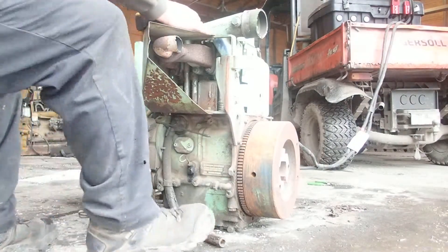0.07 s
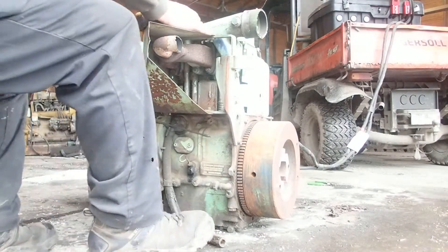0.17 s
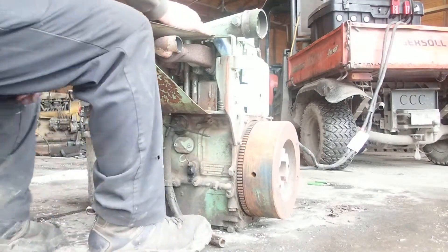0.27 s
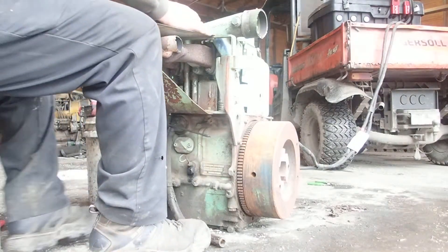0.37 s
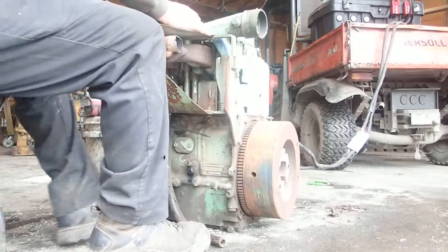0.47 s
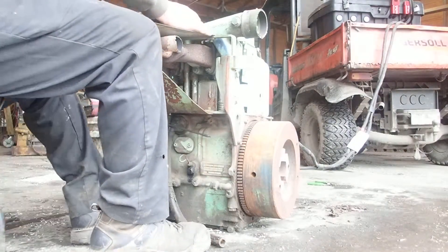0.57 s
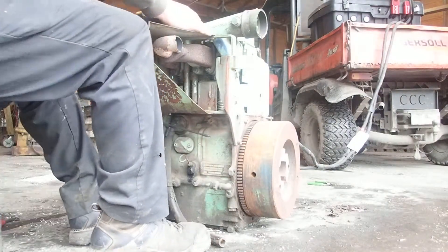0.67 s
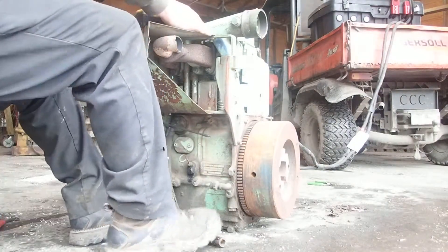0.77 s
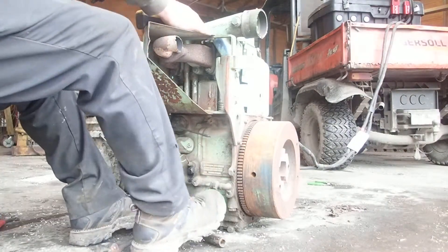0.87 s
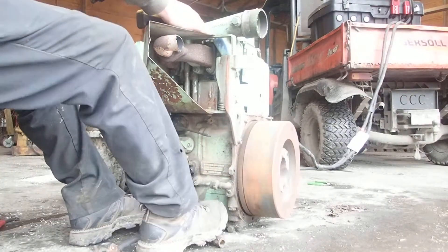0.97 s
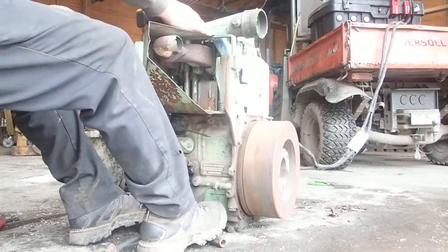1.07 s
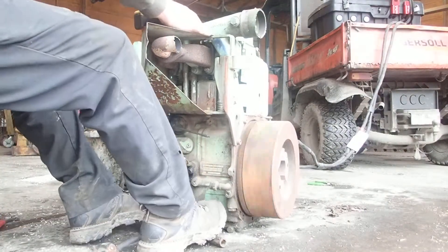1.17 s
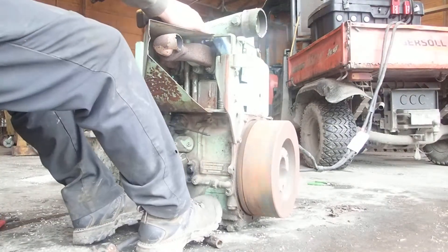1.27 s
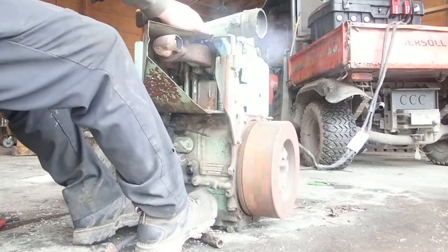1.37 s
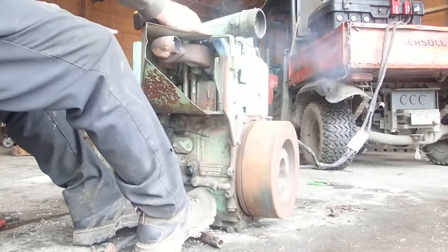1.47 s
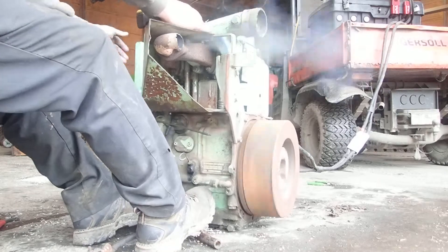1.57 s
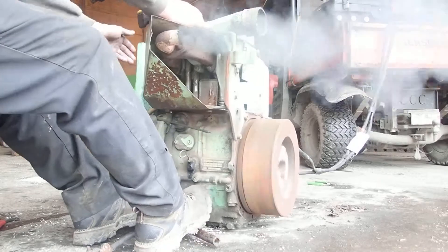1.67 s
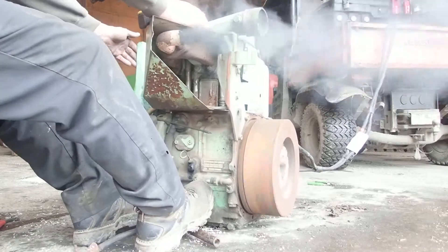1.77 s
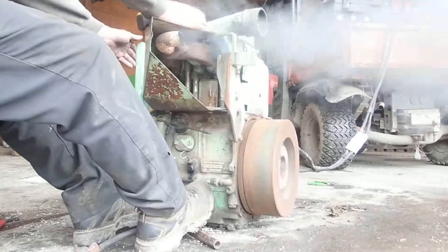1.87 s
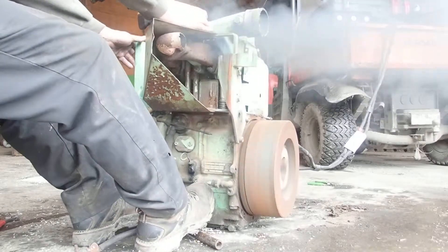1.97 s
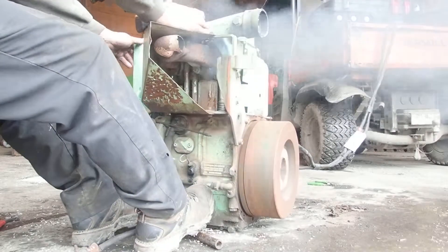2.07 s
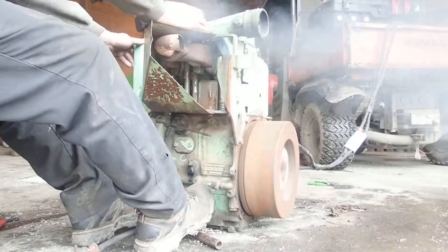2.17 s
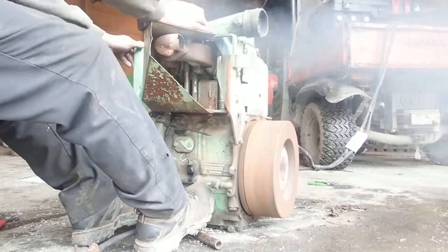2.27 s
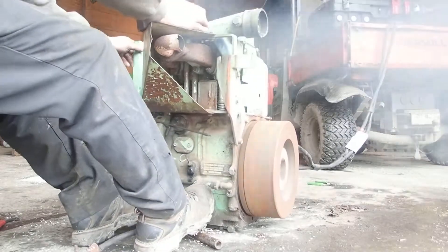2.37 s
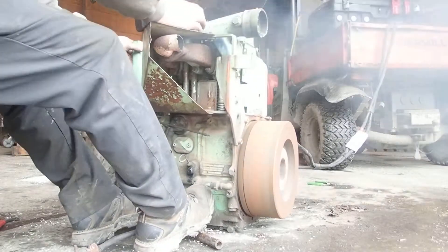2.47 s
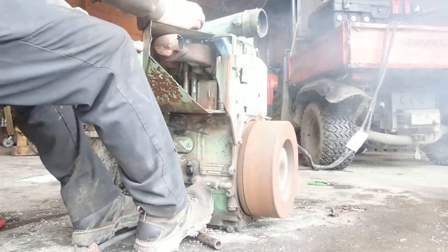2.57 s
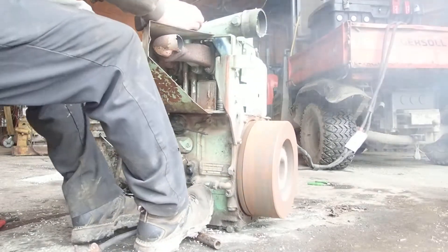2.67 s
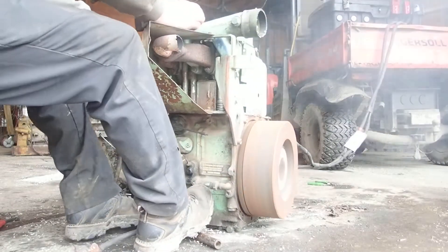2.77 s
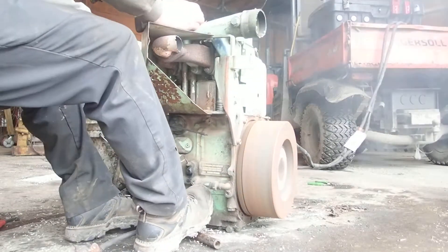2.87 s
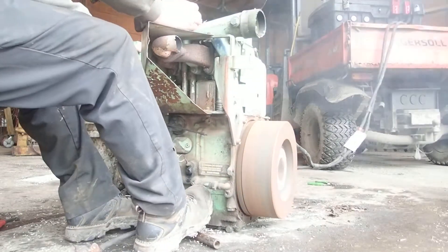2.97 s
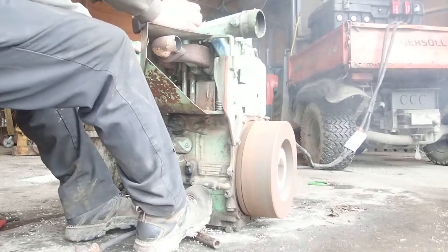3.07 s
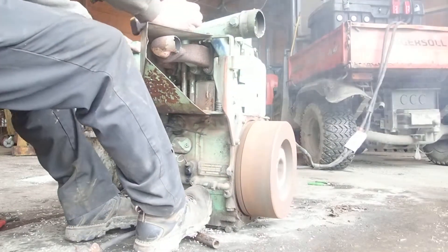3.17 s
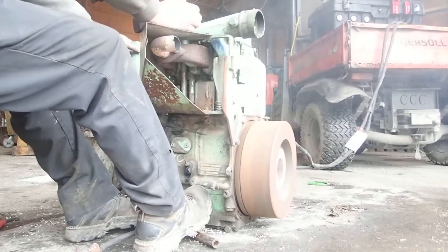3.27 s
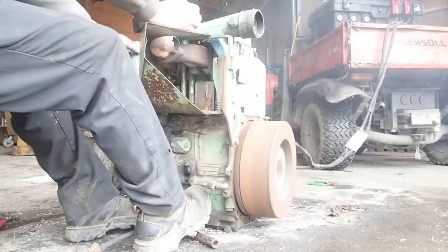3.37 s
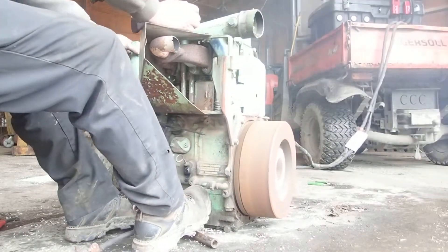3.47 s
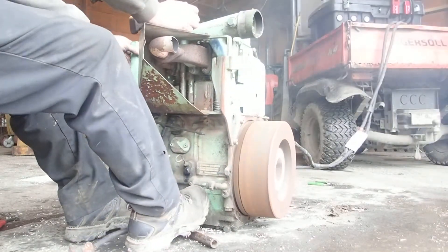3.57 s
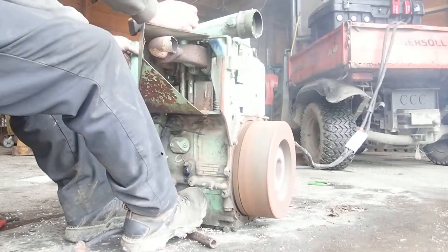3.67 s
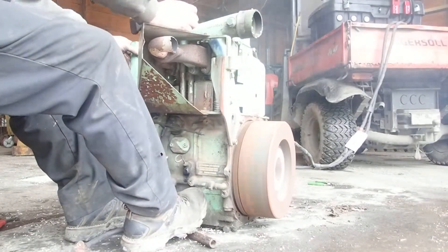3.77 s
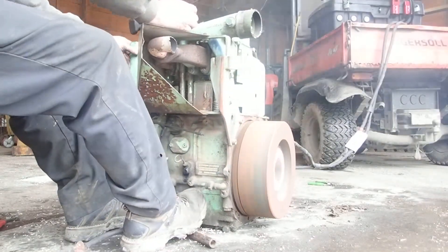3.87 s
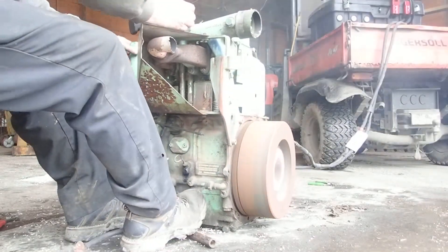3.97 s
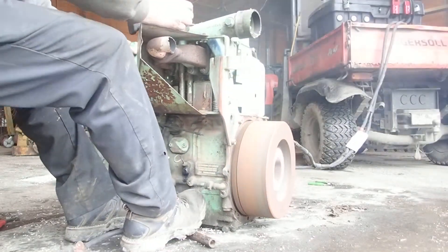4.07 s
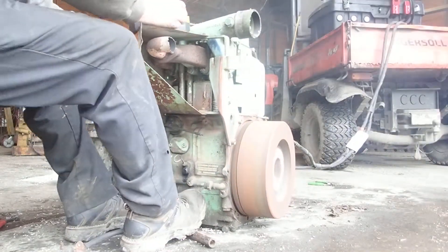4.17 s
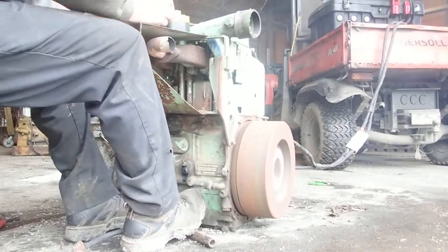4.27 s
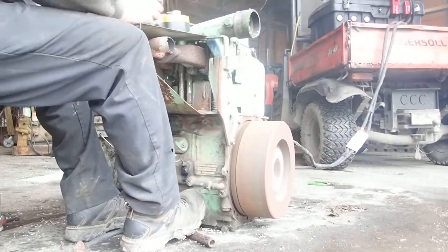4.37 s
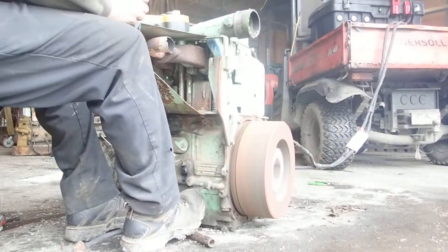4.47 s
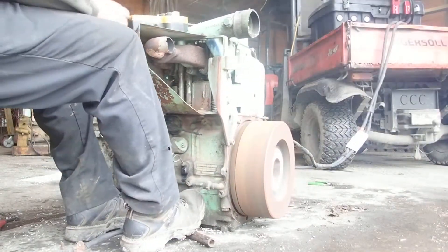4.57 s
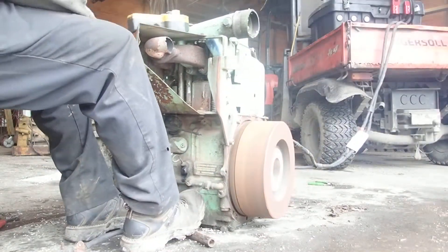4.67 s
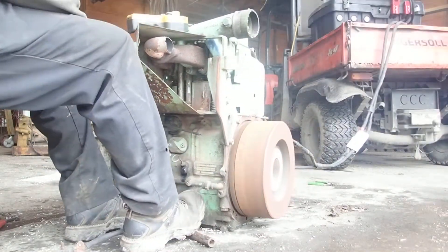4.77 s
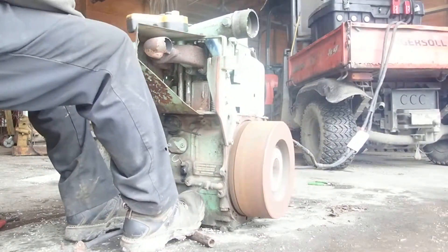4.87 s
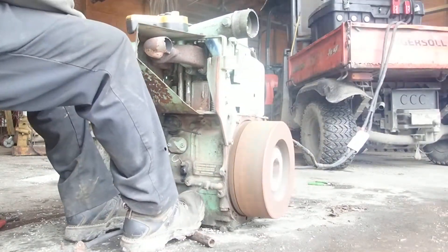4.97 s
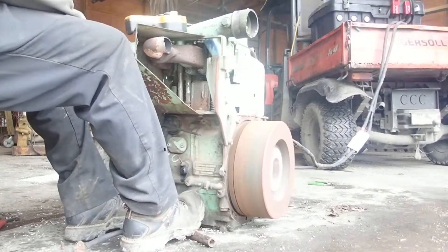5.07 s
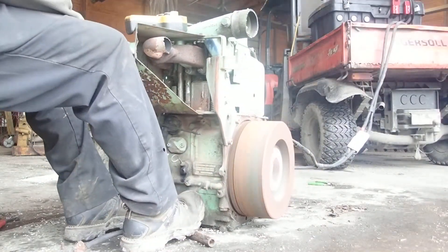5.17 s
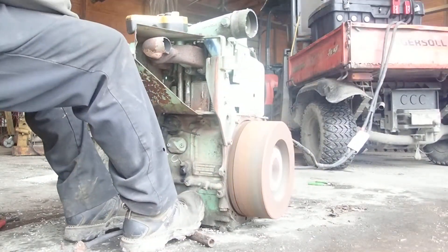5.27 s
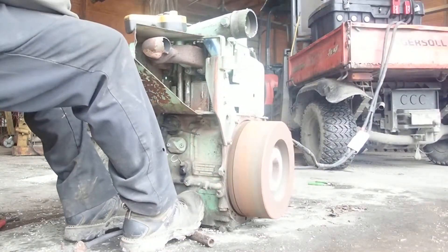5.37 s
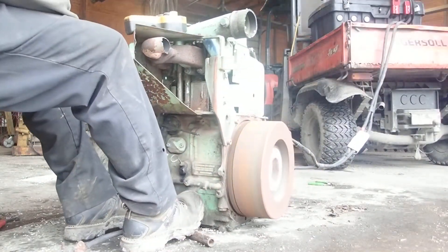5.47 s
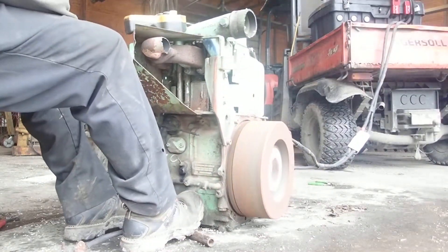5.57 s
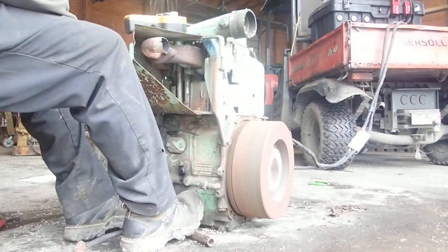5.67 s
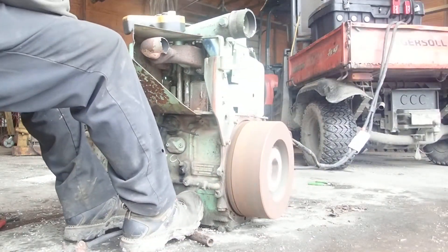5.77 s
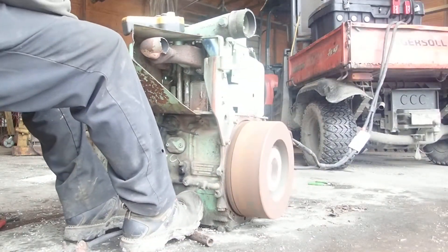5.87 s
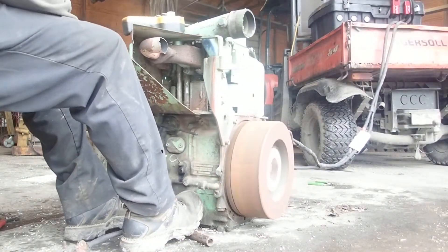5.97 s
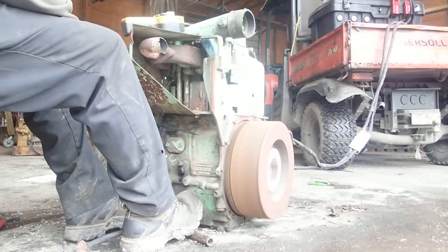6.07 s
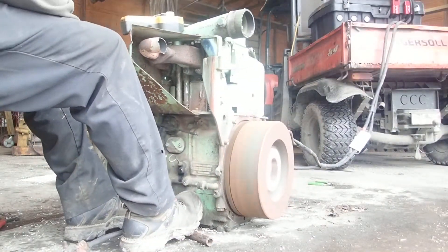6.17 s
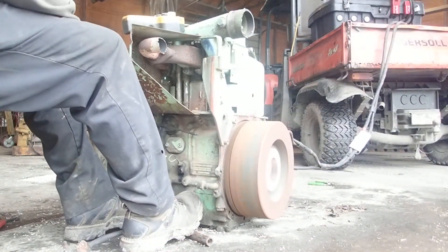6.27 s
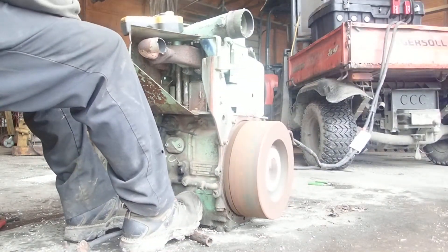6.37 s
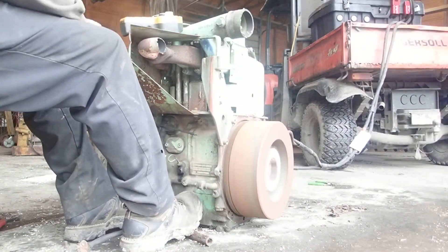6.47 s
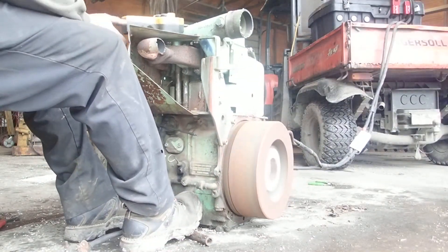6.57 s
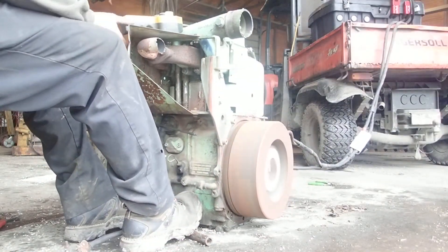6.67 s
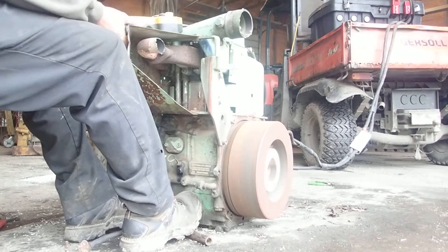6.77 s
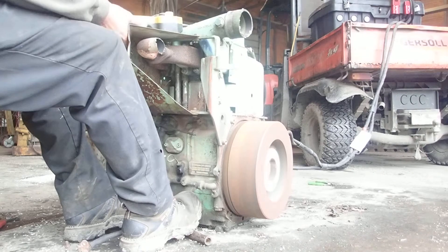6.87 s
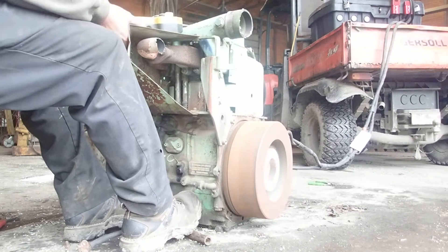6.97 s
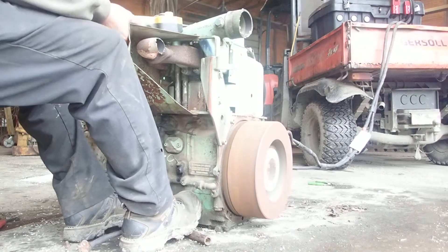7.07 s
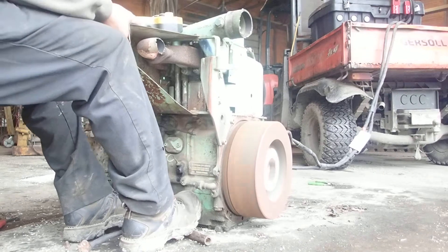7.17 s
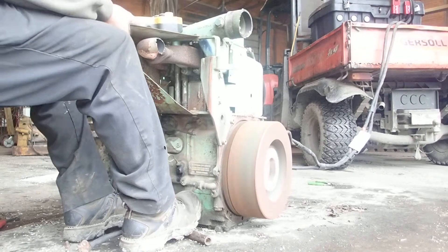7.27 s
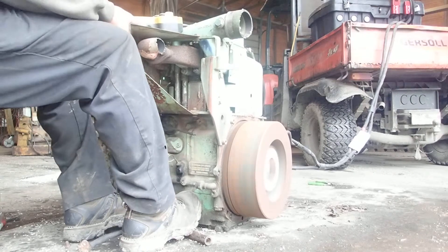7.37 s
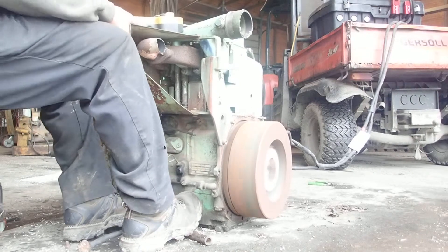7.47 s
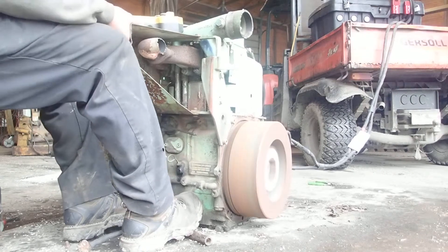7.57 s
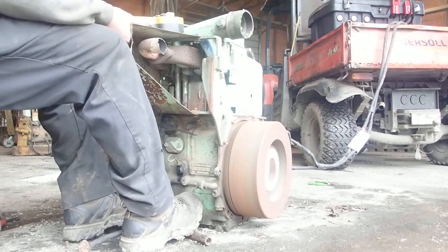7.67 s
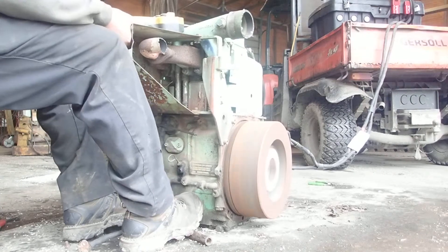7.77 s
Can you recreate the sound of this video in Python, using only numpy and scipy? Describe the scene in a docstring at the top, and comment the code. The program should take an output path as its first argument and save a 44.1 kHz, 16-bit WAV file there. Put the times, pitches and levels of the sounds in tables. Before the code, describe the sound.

From 0 s another diesel idles softly across a workshop, about twenty even ticks a second with a faint rattle and wavering hum. At 0.2-0.4 s there is a light metal click and a boot scuff on concrete, then a small dull thump near 0.55 s. A rapid, hard cluster of metal clashes lands at 0.93-0.98 s. The starter growls and scrapes until about 1.6 s, its gear rim ringing, with brief skids and low floor thumps. At 1.6 s the close engine catches: sharp, bright exhaust spits in uneven pairs, with gliding low booms and compression groans, rapidly accelerating until about 2.8 s. Around 2.9-3.2 s the harsh spits and boom fall away. From there to nearly 8 s it holds an almost constant speed: low buzzing drone, dense block knocks, crisp valve ticks and clinks, with short room reflections.

```python
"""On a workshop floor, a bare twin-cylinder air-cooled diesel is started while another engine idles further off.
The starter clashes in and grinds, made of noise bursts and gear-like noise. Then the cylinders fire in pairs,
a quarter cycle apart, and gather speed to a steady run: each puff is a burst of noise through resonances.
The block clatters with filtered knocks, the port booms with a gliding tone, and a stack of tones makes the drone.
A close microphone rounds the peaks."""
import sys
import numpy as np
from scipy import signal
from scipy.fft import rfft, irfft
from scipy.io import wavfile

SR = 44100
rng = np.random.default_rng(int(sys.argv[2]) if len(sys.argv) > 2 else 0)


def transcribe(u):
    """Save the signal u as a 16-bit wav file named by the first command-line argument.

    u: samples, shape (n,) or (channels, n), limited to [-1, 1]; the rate is SR.
    q: integer samples, one column per channel.
    """
    v = np.clip(np.atleast_2d(u).T, -1, 1)
    q = np.round(v * 32767).astype(np.int16)
    wavfile.write(sys.argv[1], SR, q)


N = 344862
TIME = np.arange(N) / SR  # seconds

# how the engine catches and runs up to its steady speed: time_s, speed (four-stroke cycles per s)
ENGINE_SPEED = [(1.6, 3.87), (1.79, 5.18), (2.17, 8.91), (2.67, 13.65), (2.82, 14.78), (3.17, 15.38),
                (4.2, 15.33), (6.3, 15.47), (7.8, 15.4)]
FIRST_PUFF_S = 1.5964


def engine_speed(s):
    """Speed in four-stroke cycles per second at a time, read from the run-up curve."""
    return np.interp(s, *np.transpose(ENGINE_SPEED))


def crank():
    """Adding up the speed gives the cycles turned since the first exhaust puff."""
    cycles = np.cumsum(engine_speed(TIME)) / SR
    return cycles - np.interp(FIRST_PUFF_S, TIME, cycles)


# the extra fuel for starting is taken back as the speed arrives: time_s, fuel_share (0-1)
STARTING_FUEL = [(2.3, 0.59), (2.65, 0.55), (2.88, 0.49), (3.03, 0.23), (3.17, 0.07)]


def fuel(s):
    """Share of the starting fuel that is still delivered at a time."""
    return np.clip(np.interp(s, *np.transpose(STARTING_FUEL)), 0, 1)


def running(rise_s=.03):
    """0 before the engine catches, rising to 1 just after."""
    return np.clip((TIME - FIRST_PUFF_S) / rise_s, 0, 1)


# exhaust puffs in each cycle: phase (0-1 of a cycle), level_db at fuel share 1, level_db at fuel share 0
EXHAUST_PUFFS = [(0, -0.5, -17), (.25, 1, -24.5)]
# tone of the escaping gas: pitch_hz, level_db
PUFF_TONE = [(1410, -34), (2400, -25), (2480, -38), (2680, -7.5), (3110, -11), (4050, -5.5), (4700, -3),
             (5200, 6), (6170, 2), (7500, 6.5), (8840, -1), (9860, -5.5), (10600, -10), (13400, -7.5),
             (15500, -26)]
# whistling tones of the exhaust port: pitch_hz, width_hz, level_db
PORT_WHISTLES = [(5260, 94, 18.5), (5810, 140, 14), (6620, 150, 15.5), (7000, 150, 16.5), (8830, 200, 15.5)]
PUFF_SCATTER_DB = 1.93
# a valve opens over a fixed crank angle, so the puff shortens with speed
PUFF_HOLD_S, PUFF_HOLD_CYCLES, PUFF_DECAY_S = .0017, .021, .0025


def exhaust_puffs(cycles, lag_s=.0009, whistle_db=-5, body_db=-8.0, thud_db=-17):
    """Each opening exhaust valve lets out a sharp spit of gas, harder with more starting fuel."""
    gas = 0
    for phase, fuelled_db, lean_db in EXHAUST_PUFFS:
        times = passes(cycles, phase)
        share = fuel(times)
        strength_db = lean_db + (fuelled_db - lean_db) * share
        strength_db = strength_db + PUFF_SCATTER_DB * rng.standard_normal(len(times))
        hold_s = PUFF_HOLD_S + PUFF_HOLD_CYCLES / engine_speed(times)
        gas = gas + bursts(times + lag_s * share, strength_db, PUFF_DECAY_S, hold_s)
    spit = colour(gas, PUFF_TONE) + undb(whistle_db) * ring(gas, PORT_WHISTLES)
    body = undb(body_db) * colour(gas, BLOCK_TONE) + undb(thud_db) * colour(gas, THUMP_TONE)
    return spit, body


# air in the port: its space shrinks as each piston rises, so the pitch climbs, then it rings out:
# phase (0-1 of a cycle), pitch_hz before drift, level_db before wavering
PORT_CAVITY = [(0, 65, 1.5), (0.121, 93, -10), (0.241, 171.4, 8), (.28, 73, -12), (0.381, 100.6, 0),
               (.48, 183.3, 3.5), (.6, 183, -1), (0.751, 165.7, -11.5), (1, 176, 5.5)]
# rms level at fuel share 1, and how steeply the boom fades as the fuel is taken back
BOOM_DB, BOOM_FUEL_POWER = -19, 0.5


def port_boom(cycles, waver_db=2.0, drift=0.044):
    """The rising pistons blow the air in the port into a tone that glides up in every exhaust stroke."""
    phase, hz, db = np.transpose(PORT_CAVITY)
    pitch_hz = np.interp(cycles % 1, phase, hz) * (1 + drift * walk(30))
    turns = np.cumsum(pitch_hz) / SR
    # the first puff of each cycle starts the swing afresh
    fresh = np.diff(np.floor(cycles), prepend=cycles[0]) > 0
    turns = turns - np.maximum.accumulate(turns * fresh)
    level_db = np.interp(cycles % 1, phase, db) + waver_db * walk(40)
    boom = unit(np.sin(2 * np.pi * turns) * undb(level_db))
    return boom * undb(BOOM_DB) * running() * fuel(TIME) ** BOOM_FUEL_POWER


# lower tones of the drone: order (multiple of the cycle rate), level_db against each other
DRONE_ORDERS = [(1, -43), (2, -42), (3, -29), (4, -23), (5, -11), (6, -26), (7, -5), (8, 0), (9, -5),
                (10, -8), (11, -19), (12, -4), (13, -10), (14, -16), (15, -2), (16, -16), (17, -17),
                (18, -12), (19, -9)]
# lifts of the fainter high tones where the port resonates: pitch_hz, half_width_hz, lift_db
PORT_LIFTS = [(341, 13.5, 11.4), (393, 12, 7.3), (477, 9.3, 5.6), (562, 6.7, 17.2), (633, 4.2, 5.8)]
HIGH_ORDER_DB, TOP_ORDER = -22.5, 41  # level before any lift, and the last tone in the stack
STEADY_RATE = 15.4  # cycles per s
# level at steady speed without starting fuel; loss for each cycle per s below that; loss at fuel share 1
DRONE_DB, DRONE_SLOW_DB, DRONE_FUEL_DB = -12, 1, 16.5


def drone(cycles, low_lag=0.181, high_lag=.62, waver_db=1.45):
    """At speed the booms merge into tones at multiples of the cycle rate, the higher ones coming later."""
    order = np.arange(1, TOP_ORDER + 1)
    high_db = HIGH_ORDER_DB
    for hz, half_width, lift in PORT_LIFTS:
        high_db = high_db + lift * np.exp(-((order * STEADY_RATE - hz) / half_width) ** 2)
    low_db = np.interp(order, *np.transpose(DRONE_ORDERS))
    order_db = np.where(order <= len(DRONE_ORDERS), low_db, high_db)
    lag = np.interp(order, [9, 14], [low_lag, high_lag])  # in turns of the tone, added up below
    # orders above the cavity's range arrive by many paths, spread over the whole turn
    lag = lag + (order > 16) * rng.random(len(order))
    tones = 0
    for k, db, late in zip(order, order_db, np.cumsum(lag)):
        tones = tones + undb(db + waver_db * walk(9)) * np.cos(2 * np.pi * (k * cycles - late))
    slow = np.maximum(STEADY_RATE - engine_speed(TIME), 0)
    level_db = DRONE_DB - DRONE_SLOW_DB * slow - DRONE_FUEL_DB * fuel(TIME)
    return unit(tones) * running() * undb(level_db)


# blows from combustion, pistons and rockers: phase (0-1 of a cycle), level_db against each other, decay_s
BLOCK_KNOCKS = [(.015, 1.5, 0.025), (.2, -3.5, 0.015), (.29, 7.5, 0.0027), (.4, 0.5, 0.022),
                (.53, 0, 0.0065), (.59, -9.5, .005), (.7, 1.5, 0.0094), (.84, 0.5, 0.0092)]
# bright ticks of the valve gear: phase (0-1 of a cycle), level_db against each other, decay_s
VALVE_TICKS = [(.18, 10, 0.025), (.42, 8.5, 0.02), (.66, 2, 0.0057), (.8, 1.5, .015), (.94, 1, 0.0094)]
# tone of the block, also heard in the puffs: pitch_hz, level_db
BLOCK_TONE = [(180, -24.5), (300, -2.5), (368, -13.5), (519, -15), (563, -16), (711, -17), (804, -11.5),
              (908, -11), (1110, -8.5), (1220, -8), (1510, -12.5), (1620, -15), (2170, -14.5), (2480, -31),
              (3400, -35.5), (4420, -75), (7480, -120)]
# ringing tones of the casting: pitch_hz, width_hz, level_db
CASTING_RINGS = [(830, 29, -5.5), (1097, 58, 5), (1282, 49, -7.5), (1412, 106, -2)]
# tone of steel on steel, also heard in the starter and clashes: pitch_hz, level_db
STEEL_TONE = [(1500, -43.5), (2400, -4.5), (3200, -11), (4050, -0.5), (4550, -1), (5200, 5), (6000, 1.5),
              (6700, 6), (7700, 3), (8700, 1.5), (9600, -3), (10600, -14), (15000, -15)]
# clatter at fuel share 1 and at 0; groan of compression at fuel share 1
CLATTER_START_DB, CLATTER_RUN_DB, GROAN_DB = -32, -22, -17


def block(cycles, knock_db=-1, mode_db=-8, tappet_db=-5.5, clink_db=-19.5, groan_ring_db=-4):
    """Knocks ring the casting, valve gear ticks, steel clinks once a cycle; fuelled compression groans."""
    effort = undb(CLATTER_RUN_DB + (CLATTER_START_DB - CLATTER_RUN_DB) * fuel(TIME))
    knocks = effort * cycle_blows(cycles, BLOCK_KNOCKS, alike=0.5, scatter_db=2.4, jitter_s=.00006)
    compression = np.interp(cycles % 1, [.78, .85, .94, 1], [0, 1, .6, 0])
    groan = undb(GROAN_DB) * running() * fuel(TIME) * compression * rng.standard_normal(N)
    ticks = colour(cycle_blows(cycles, VALVE_TICKS, alike=0.57, scatter_db=1.5), STEEL_TONE)
    clink_blows = cycle_blows(cycles, [(.63, 0, .008)], alike=.1)
    clink = ring(clink_blows, [(4100, 200, 0), (4400, 350, -4)])
    bright = effort * (undb(tappet_db) * ticks + undb(clink_db) * clink)
    dull = undb(knock_db) * colour(knocks + groan / 2, BLOCK_TONE)
    ringing = ring(undb(mode_db) * knocks + undb(groan_ring_db) * groan, CASTING_RINGS)
    return bright, dull + ringing


# starter parts over time, before their trims: time_s, growl_db, scrape_db, rim_ring_db, engine_shake_db
STARTER_LEVELS = [(0.99, -23, -34, -25.5, -27), (1.106, -16.5, -32, -33, -39),
                  (1.144, -17.5, -30, -23, -20), (1.266, -17, -38.5, -34, -11.5),
                  (1.346, -21.5, -26, -18.5, -20), (1.536, -17, -28.5, -18, -22),
                  (1.585, -15.5, -25, -25, -17)]
# ring of the flywheel and its gear: pitch_hz, width_hz, level_db
RIM_RINGS = [(4025, 13, -4), (4100, 110, -10), (4850, 52, -12), (5900, 89, -20), (6960, 200, -11)]
# growling tone of gears, also the body of the clashes: pitch_hz, level_db
GEAR_TONE = [(120, -40), (250, -8), (400, -4.5), (700, -10), (830, -3.5), (1150, -4.5), (1380, -1.5),
             (1640, -7), (2100, -11.5), (2450, -25), (3400, -32), (5000, -64)]


def starter(tooth_hz=310, depth=0.62, growl_db=-1, scrape_db=0, rim_db=-2.5, after_ring_db=-12, shake_db=-2.5):
    """Pinion teeth growl and scrape on the ring gear, the rim sings and the loose engine shakes on the floor."""
    growl, scrape, rim, shake = gains(STARTER_LEVELS)
    mesh = np.cumsum(tooth_hz * (1 + 0.072 * walk(40))) / SR % 1  # 0-1 through each tooth
    teeth = unit(np.exp(-mesh / depth) * undb(1.5 * walk(120)) * rng.standard_normal(N))
    rumble_tone = [(30, -36), (60, 0), (110, 0.5), (180, -2.5), (300, -13.5), (900, -62)]  # Hz, dB
    rumble = colour(rng.standard_normal(N), rumble_tone)
    song = undb(rim_db) * rim * ring(teeth, RIM_RINGS)
    after_ring = undb(after_ring_db) * workshop(song, t60=1.37)
    bright = undb(scrape_db) * scrape * colour(teeth, STEEL_TONE) + song + after_ring
    body = undb(growl_db) * growl * colour(teeth, GEAR_TONE) + undb(shake_db) * shake * rumble
    return bright, body


# metal clashes of lever, solenoid and pinion: start_s, bright_db, body_db, decay_s
METAL_CLASHES = [(0.241, -22.5, -38, 0.0014), (.9265, -15.5, -16, 0.01), (0.944, -20, -17, 0.0069),
                 (0.951, -18, -10, 0.0056), (.958, -7.5, -5.5, 0.0035), (0.966, -15, -16, 0.019),
                 (.974, -12, -8, 0.0066)]
# the pinion skids on the ring gear: start_s, level_db, decay_s
PINION_SKIDS = [(1.196, -23.5, 0.013), (1.436, -21, .011), (1.476, -20, 0.0076)]
# tone of a skid: pitch_hz, level_db
SKID_TONE = [(3500, -35), (5800, 10), (7200, 4), (8600, 2), (10500, -12), (13000, -7), (15500, -18)]
# dull thumps of a boot and of the engine rocking on the floor: start_s, level_db, decay_s
FLOOR_THUMPS = [(.564, -22, .004), (1.147, -19, .009), (1.249, -11, .013), (1.461, -16, .01),
                (1.544, -11, .012)]
# tone of a thump, also heard in the puffs: pitch_hz, level_db
THUMP_TONE = [(30, -9), (80, -6), (150, -8.5), (300, 0), (420, -5), (700, -23.5), (2000, -74)]


def handling(scuff_db=-31, slab_hz=175, slab_db=4):
    """Metal clashes and skids, dull thumps that ring the floor slab, and a boot scuffing over concrete."""
    clash_bright = sum(bursts([s], db, decay, hold=0.00055) for s, db, _, decay in METAL_CLASHES)
    clash_body = sum(bursts([s], db, decay, hold=.001) for s, _, db, decay in METAL_CLASHES)
    skids = sum(bursts([s], db, decay, hold=0.0075) for s, db, decay in PINION_SKIDS)
    thumps = sum(bursts([s], db, decay, hold=.005) for s, db, decay in FLOOR_THUMPS)
    slab = 0
    for s, db, decay in FLOOR_THUMPS:
        age = np.maximum(TIME - s, 0)
        swell = age / (decay / 2) * np.exp(1 - age / (decay / 2))  # rises to 1, then dies away
        slab = slab + undb(db + slab_db) * np.sin(2 * np.pi * slab_hz * age) * swell
    scuff_shape = np.interp(TIME, [.22, .25, .29, .32, .39], [0.36, 0.76, 0.62, 1.16, 0.3])
    scuff = scuff_shape * undb(scuff_db + 5.5 * walk(119.3)) * rng.standard_normal(N)
    bright = colour(clash_bright, STEEL_TONE) + colour(skids, SKID_TONE)
    body = colour(clash_body + scuff, GEAR_TONE) + colour(thumps, THUMP_TONE) + slab
    return bright, body


# tone of the other engine's rattle: pitch_hz, level_db
IDLER_TONE = [(24, -88), (40, -9.5), (164, -5), (221, -9.5), (612, -30), (659, -18), (804, -22),
              (1350, -22.5), (3220, -38), (4030, -23.5), (4450, -35), (5430, -23.5), (8480, -23.5),
              (10900, -42), (15000, -42)]
# tone of its ticks: pitch_hz, level_db
IDLER_TICK_TONE = [(2000, -38), (3400, -31), (4020, -4.5), (4470, -15), (5380, -5), (6940, -4), (7530, -12),
                   (8470, -2.5), (9410, -5), (10900, -41), (15000, -39)]
# swells of its hum: centre_s, length_s, level_db
IDLER_HUM = [(0.234, 0.23, -39.5), (0.838, 0.19, -37.5)]
IDLER_FIRST_S, IDLER_PERIOD_S = .0205, .0498  # first tick, and time from tick to tick


def idler(level_db=-38.0, tick_db=-28.5, between_db=-39):
    """A second diesel idles across the shop: even ticks, softer knocks between, rattle and a wavering hum."""
    times = np.arange(IDLER_FIRST_S, N / SR, IDLER_PERIOD_S)
    ticks = bursts(times, tick_db + rng.standard_normal(len(times)), .004, alike=.4)
    ticks = ticks + bursts(times + .028, between_db, .006)
    rattle = bursts(times, 0, 0.0067, alike=0.19) + bursts(times + 0.025, 0, 0.0097, alike=0.32)
    rattle = unit(rattle + 0.99 * rng.standard_normal(N))
    swell = sum(undb(db) * np.exp(-(2 * (TIME - s) / length) ** 2) for s, length, db in IDLER_HUM)
    hum = swell * unit(np.sin(2 * np.pi * np.cumsum(163 + 3 * walk(13)) / SR))
    return colour(ticks, IDLER_TICK_TONE), undb(level_db) * colour(rattle, IDLER_TONE) + hum


def workshop(x, t60, delay=0.0023):
    """Diffuse reflections from floor, walls and parked machines: noise that loses 60 dB in t60 seconds."""
    t = TIME[:SR // 2]
    echoes = rng.standard_normal(len(t)) * np.exp(-np.log(1000) * t / t60) * (t > delay)
    return signal.fftconvolve(x, echoes / np.linalg.norm(echoes))[:N]


def passes(cycles, phase):
    """Times at which the crank passes a phase of its cycle."""
    return np.interp(np.arange(phase, cycles[-1]), cycles, TIME)


def cycle_blows(cycles, table, alike, scatter_db=3.4, jitter_s=.0001):
    """Blows that return in each cycle, never quite equal in strength or timing, scaled to rms 1."""
    out = 0
    for phase, db, decay in table:
        times = passes(cycles, phase)
        late, louder = rng.standard_normal((2, len(times)))
        out = out + bursts(times + jitter_s * late, db + scatter_db * louder, decay, alike=alike)
    return unit(out)


def bursts(times, db, decay, hold=0., alike=0.):
    """Noise bursts that hold, then die away; a share of the grain is the same in every blow."""
    out = np.zeros(N + SR)
    t = TIME[:SR // 10]
    same = rng.standard_normal(len(t))
    share = np.clip(alike, 0, 1)
    for s, gain, held in np.broadcast(times, undb(db), hold):
        i = int(np.clip(s * SR, 0, N))
        shape = np.exp(-np.maximum(t - held, 0) / decay)
        grain = np.sqrt(share) * same + np.sqrt(1 - share) * rng.standard_normal(len(t))
        out[i:i + len(t)] += gain * shape * grain
    return out[:N]


def ring(x, modes):
    """Ring a set of fading tones (Hz, width Hz, dB), of unit energy together."""
    t = TIME[:SR // 10]
    h = 0
    for hz, width, db in modes:
        fading = np.sqrt(width) * np.exp(-np.pi * width * t)  # wider modes die sooner
        h = h + undb(db) * fading * np.sin(2 * np.pi * hz * t)
    return signal.fftconvolve(x, h / np.linalg.norm(h))[:N]


def colour(x, points):
    """Filter to a (Hz, dB) tone curve, with unit energy and no sound before its cause."""
    size = 4096
    hz, db = np.transpose(points)
    log_hz = np.log(np.maximum(np.fft.rfftfreq(size, 1 / SR), 1))
    # folding the cepstrum puts the filter's energy as early as possible (minimum phase)
    cepstrum = irfft(np.log(undb(np.interp(log_hz, np.log(hz), db))))
    cepstrum[1:size // 2] *= 2
    cepstrum[size // 2 + 1:] = 0
    h = irfft(np.exp(rfft(cepstrum)))
    return signal.fftconvolve(x, h / np.linalg.norm(h))[:N]


def walk(rate):
    """Random drift: straight lines between random points, rate points per second."""
    count = int(N / SR * rate) + 2
    return 0.81 * np.interp(TIME * rate, np.arange(count), rng.standard_normal(count))


def gains(table, fade=0.026):
    """Each dB column of a curve as a gain over time, fading to silence just outside its span."""
    s, *columns = np.transpose(table)
    gate = np.interp(TIME, [s[0] - fade, s[0], s[-1] + fade, s[-1] + 2 * fade], [0, 1, 1, 0])
    return [gate * undb(np.interp(TIME, s, db)) for db in columns]


def undb(db):
    """Decibels to gain."""
    return 10 ** (np.asarray(db) / 20)


def unit(x):
    """Scale to rms 1."""
    return x / np.sqrt(np.mean(x ** 2))


def scene(bright_wet_db=-18, body_wet_db=-13, spread_db=-11, far_spread_db=-19, left_db=-1.81):
    """The bass is nearly alike in both channels, a little softer left; treble echoes differ between them."""
    cycles = crank()
    sources = [exhaust_puffs(cycles), block(cycles), starter(), handling(), idler()]
    bright, body = np.sum(sources, axis=0)
    centre = body + undb(body_wet_db) * workshop(body, t60=0.68) + port_boom(cycles) + drone(cycles)
    treble = bright + undb(bright_wet_db) * workshop(bright, t60=1.0)
    near_spread = undb(spread_db) * workshop(bright, t60=0.029, delay=0.00067)
    far_spread = undb(far_spread_db) * workshop(bright, t60=0.95)
    sides = np.array([[1], [-1]])  # left, right
    return centre * undb(sides * left_db / 2) + treble + sides * (near_spread + far_spread)


def record(dry, ceiling=0.95, low_hz=48, top_hz=15700):
    """The microphone thins the deepest bass, rounds the loudest peaks and cuts the top."""
    thin = signal.sosfilt(signal.butter(2, low_hz, "high", fs=SR, output="sos"), dry)
    rounded = thin / (1 + (thin / ceiling) ** 6) ** (1 / 6)
    return signal.sosfilt(signal.ellip(8, .2, 80, top_hz, fs=SR, output="sos"), rounded)


dry = scene()
out = record(dry)
transcribe(out)
```